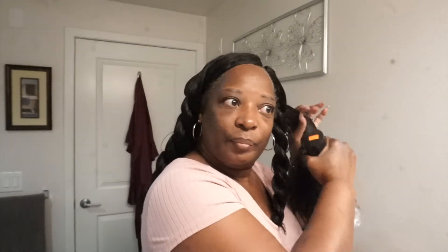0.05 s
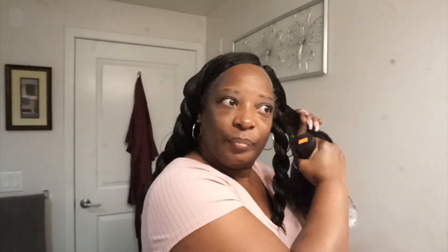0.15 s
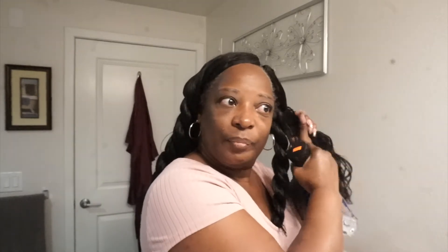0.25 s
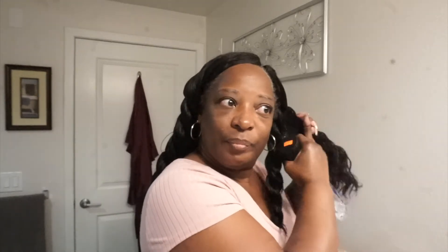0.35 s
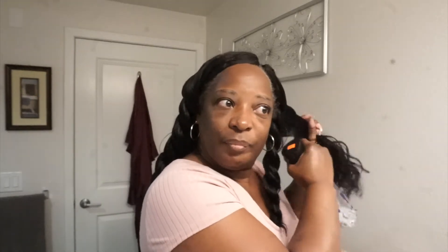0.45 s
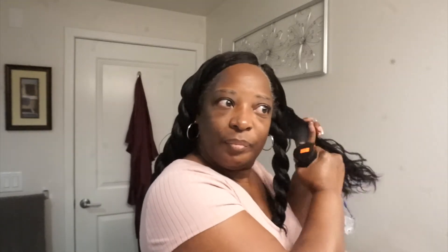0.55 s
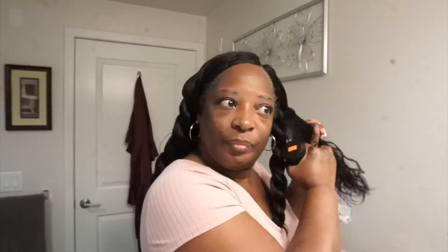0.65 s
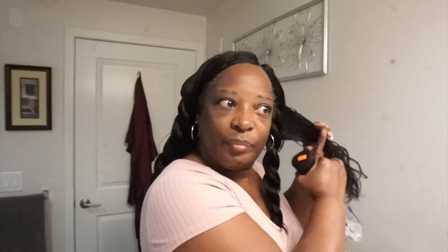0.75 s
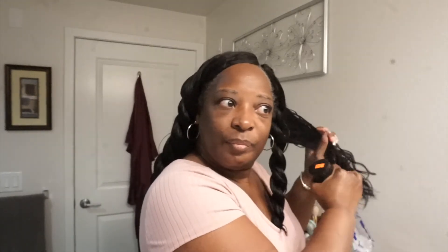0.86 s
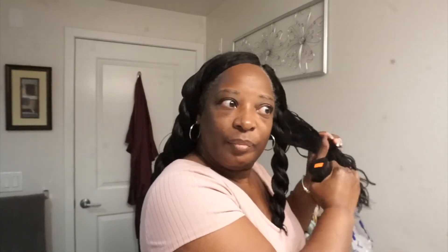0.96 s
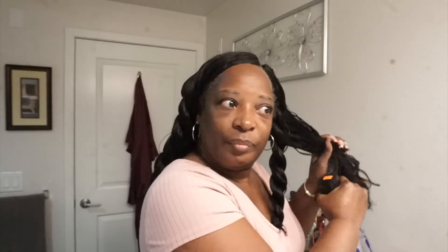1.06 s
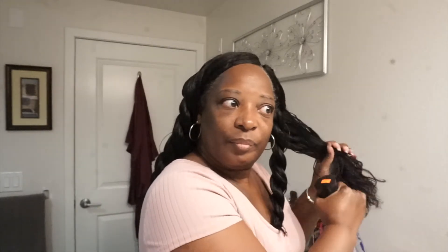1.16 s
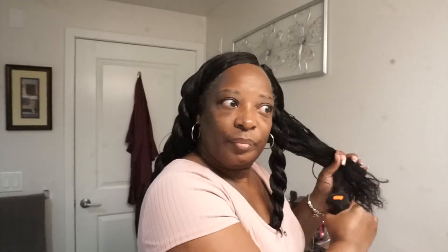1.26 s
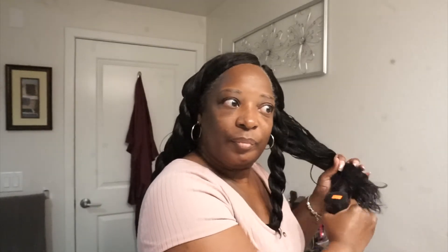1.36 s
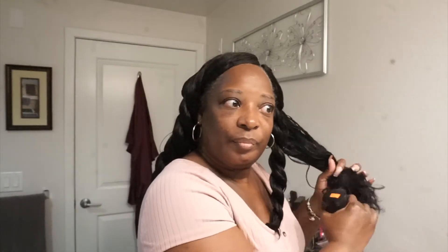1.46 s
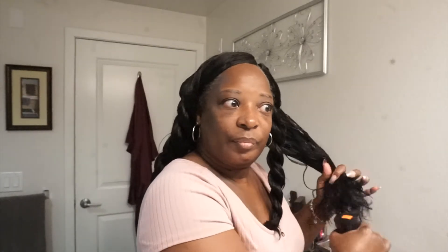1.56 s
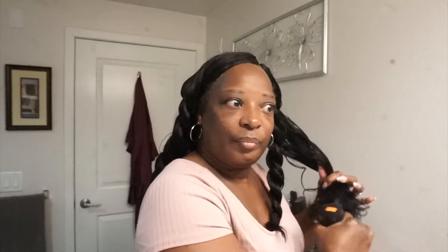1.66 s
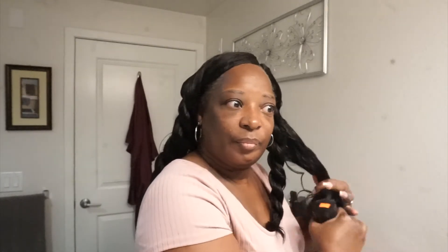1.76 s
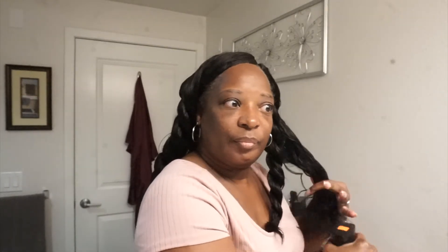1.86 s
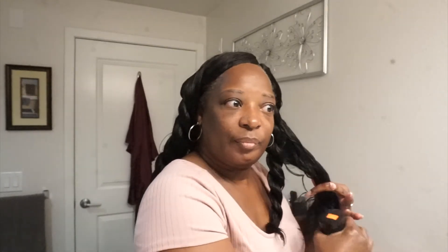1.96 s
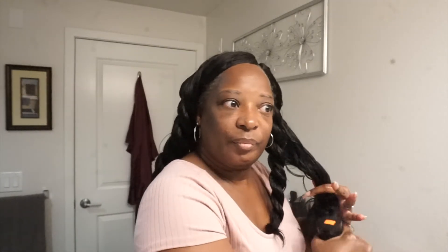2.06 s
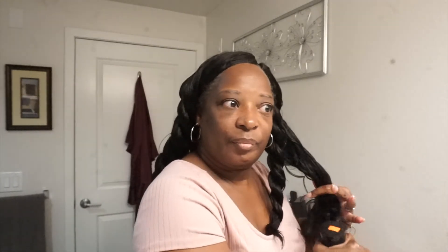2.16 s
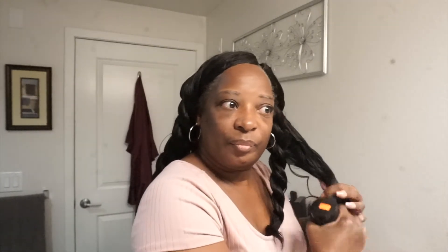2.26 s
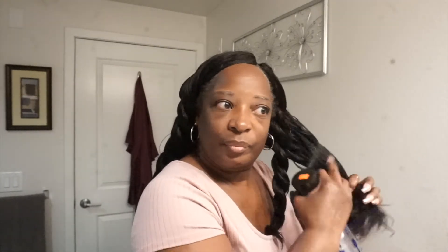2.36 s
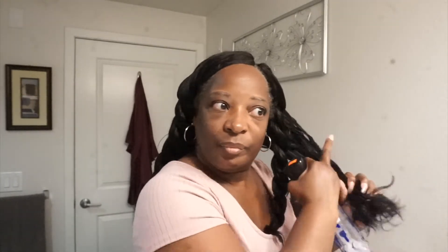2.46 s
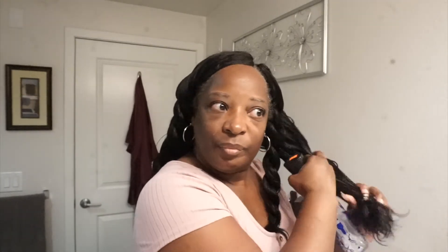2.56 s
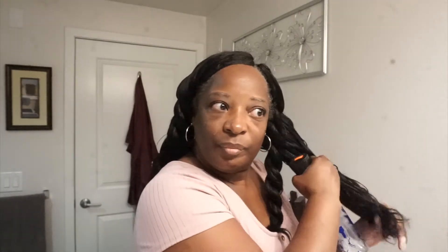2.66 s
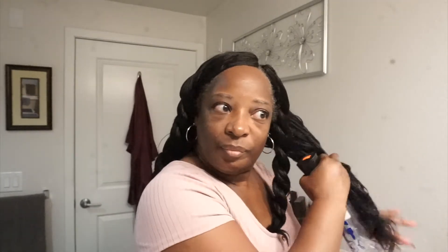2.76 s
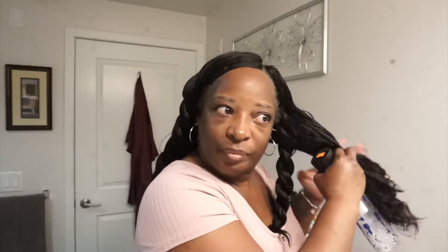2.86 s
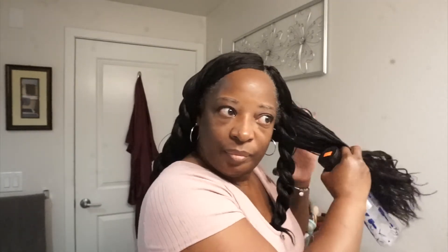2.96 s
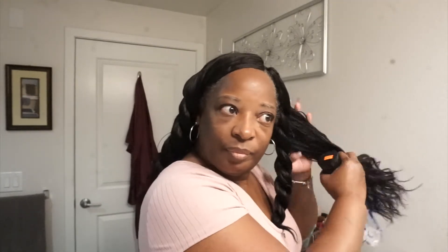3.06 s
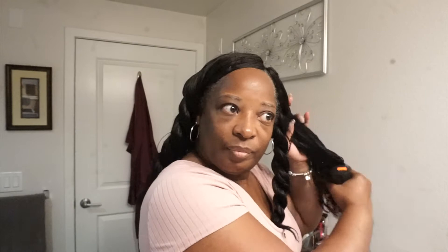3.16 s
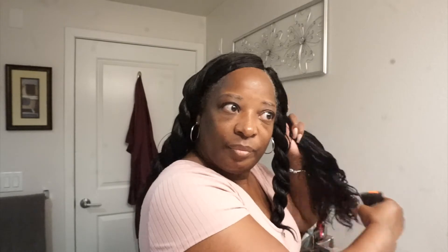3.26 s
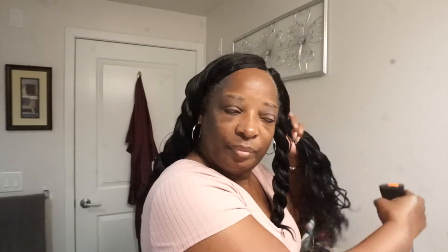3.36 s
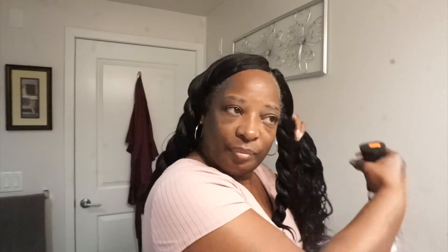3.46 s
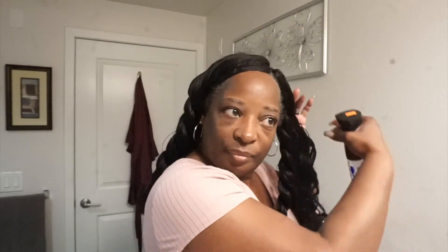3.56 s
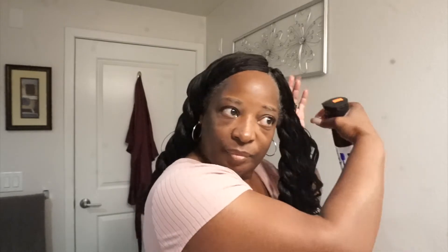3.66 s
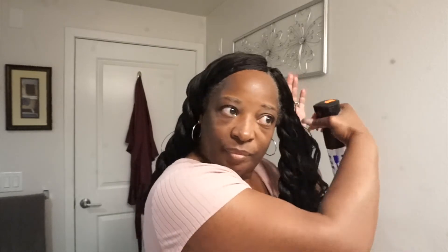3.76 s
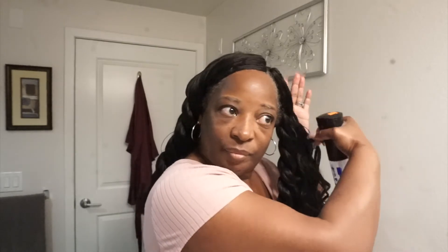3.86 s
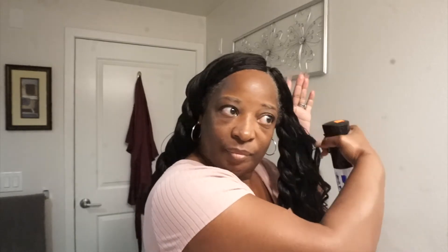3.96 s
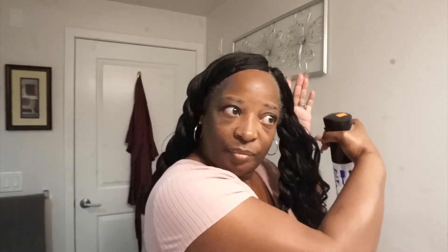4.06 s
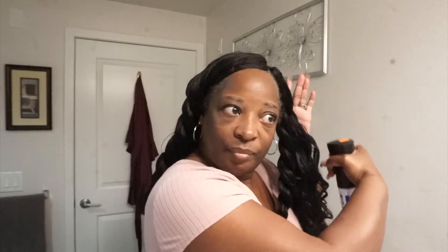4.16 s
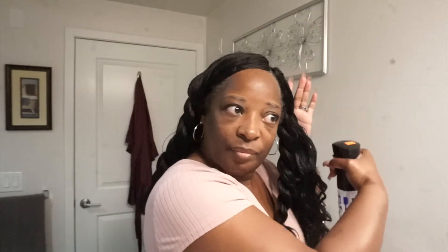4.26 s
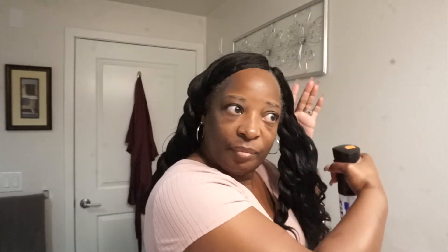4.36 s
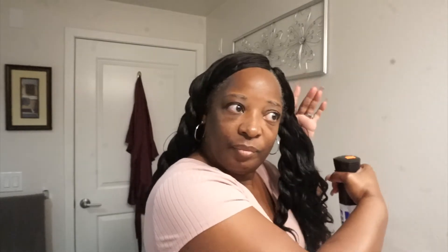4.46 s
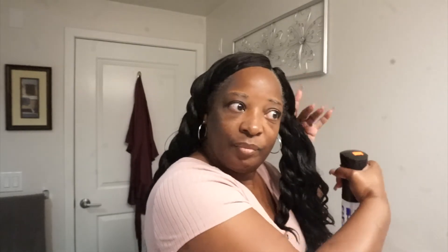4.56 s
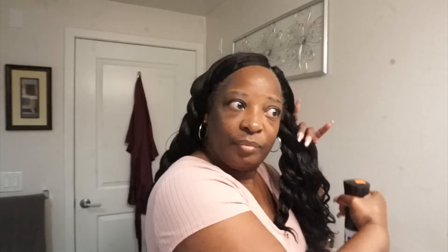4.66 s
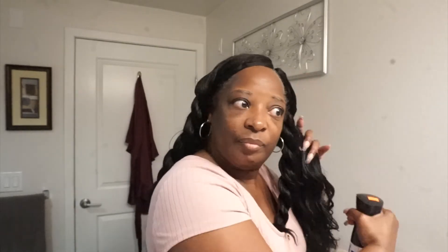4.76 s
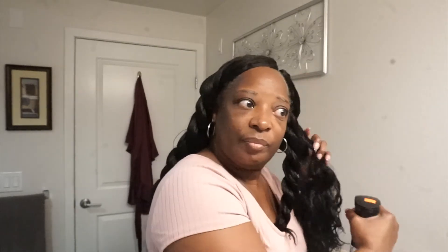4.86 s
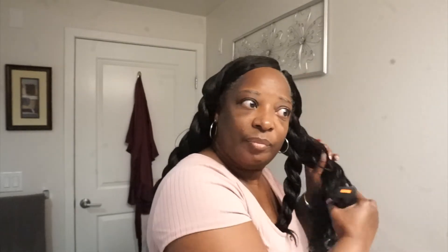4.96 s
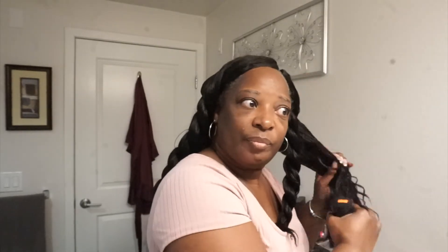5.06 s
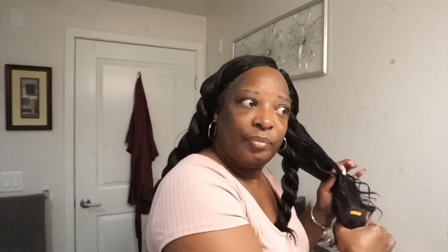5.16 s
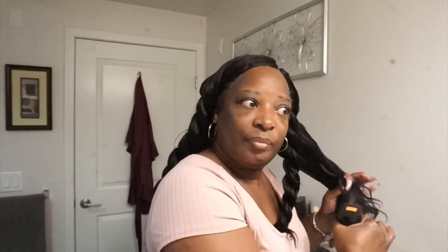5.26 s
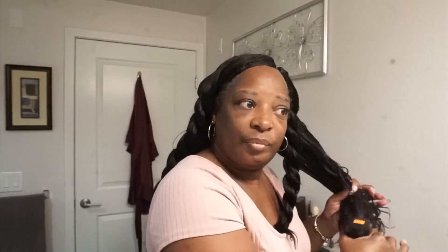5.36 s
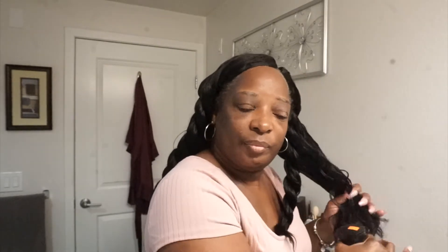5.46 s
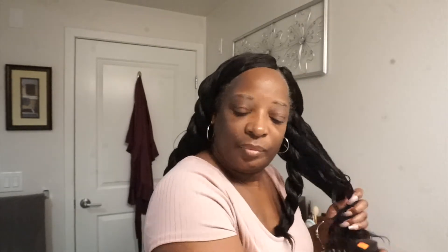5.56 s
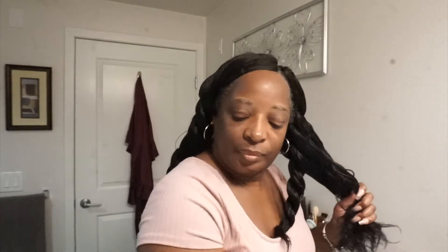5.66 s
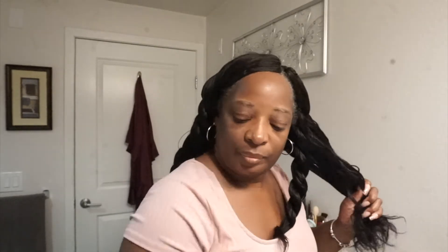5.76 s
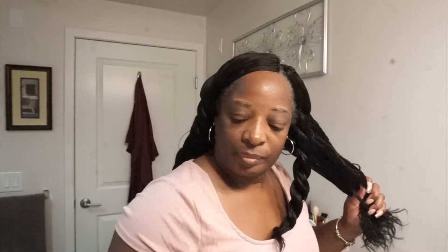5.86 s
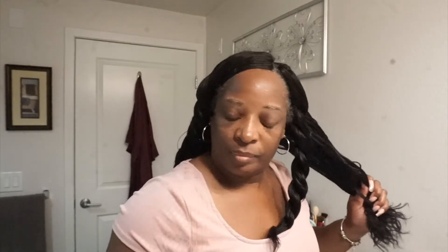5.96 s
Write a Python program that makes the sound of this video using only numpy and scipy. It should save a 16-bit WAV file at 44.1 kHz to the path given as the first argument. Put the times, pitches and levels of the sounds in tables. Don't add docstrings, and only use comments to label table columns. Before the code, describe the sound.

A small hard-walled bathroom with a constant, low-level fan hum and airy ventilation noise, heard on a stereo phone about a metre away. A mist spray is already ending at 0 s, with a hollow tap and small trigger ticks up to 0.35 s. A long, bright, fizzy hiss runs from 0.4 to 1.45 s, with crisp clicks at about 0.8 and 1.3. Shorter hisses follow at 1.5-1.75 and 2.0-2.35, the latter fading, with more ticks and dull bottle knocks. At 2.73 a hard plastic double rap cracks out, the loudest event, ringing briefly off the walls. Faint ticks come at 3.1 and 3.6. A long steady hiss fills 3.75-4.65, with a resonant hollow knock near 3.9. Light clicks lead into the last spray, 5.0-5.55, which has a click around 5.36. Soft ticks and a faint dying hiss leave the fan until 6 s.

```python
import sys
import numpy as np
from scipy import signal
from scipy.fft import rfft, irfft, next_fast_len
from scipy.io import wavfile
from scipy.ndimage import uniform_filter1d, map_coordinates

SR = 44100
rng = np.random.default_rng(int(sys.argv[2]) if len(sys.argv) > 2 else 0)


def amplitude_ratio(level_db):
    exponent = np.asarray(level_db, float) / 20
    return 10 ** exponent


def int16_out(signal):
    q = np.round(np.clip(np.atleast_2d(signal).T, -1, 1) * 32767)
    wavfile.write(sys.argv[1], SR, q.astype(np.int16))


N = 264864

# pitch_hz, width_hz, level_db
FAN_TONES = [(119.5, 6, -108), (241, 5.5, -82.5), (367.7, 9.5, -78.5), (476, 10, -79), (592, 14, -78.5),
             (1320, 6, -76), (1384, 11, -80)]
# freq_hz, density_db (per Hz)
AIR_SPECTRUM = [(35, -78), (60, -30.5), (203, -24.5), (232, -13.5), (329, -17), (367, -2.5), (400, -12),
                (605, -5), (705, -9.5), (1220, -9), (1330, -7.5), (1510, -9.5), (11000, -20), (14300, -96),
                (22000, -120)]
# freq_hz, likeness (-1 to 1)
AIR_ALIKE = [(60, 0.26), (220, 0.56), (830, -0.22), (3100, -0.035), (11500, 0.13)]
# time_s, gain_db
AIR_DRIFT = [(0, 2), (2.6, 2.5), (3.3, -0.5), (4.9, 2), (6, 0)]
# freq_hz, t60_s
WALL_DECAY = [(500, 0.59), (1500, 0.43), (3000, 0.46), (6000, 0.34), (11000, 0.28)]
# freq_hz, likeness (-1 to 1)
WALL_ALIKE = [(300, 0.83), (1200, 0.26), (2500, 0.36), (5000, 0), (11000, 0.16)]
# start_s, level_db, crack_db (over the blow)
RAPS = [
    (2.7297, -21.5, -54),
    (2.7329, -15, -31),
]
# pitch_hz, width_hz, level_db
SHELL_MODES = [(775, 250, -7), (1300, 180, 4), (1600, 290, 1.5), (2240, 246, 5.5), (3120, 380, -1),
               (4160, 360, -10.5)]
# start_s, level_db, bright_db (over tick), lever_hz, lever_db (over tick)
TICKS = [(0.1255, -41, -21.5, 2340, -23), (0.332, -39.5, -15, 3130, -7), (0.3352, -43, -9, 2340, 2),
         (0.8160, -31.5, 6.5, 3920, 4.5), (1.279, -29, 3, 3390, -14), (1.956, -40.5, -10, 2230, -20),
         (2.173, -31.5, 6, 1950, 0.5), (2.3107, -31, -12, 3250, -12), (2.4763, -46, -30, 2800, -9),
         (2.481, -51, -30, 1800, 1), (2.5194, -43, -11, 3240, -6), (2.555, -55, -19, 3500, 0),
         (3.144, -49, -12, 1690, -3), (3.558, -53, -10, 1870, -3), (3.561, -49, 2.5, 3280, 2),
         (3.623, -45.5, -16, 3200, -4), (3.633, -50.5, -24, 3280, -4), (3.8759, -38, -31, 1780, 8.5),
         (4.959, -40.5, -12, 3700, -5), (4.9645, -47.5, -7, 3600, -14), (5.011, -46.5, -2, 2800, -1),
         (5.3617, -35, 5, 3100, -10), (5.648, -45, -2, 2820, 5), (5.6517, -42, 1, 3500, 0.5)]
# pitch_hz, width_hz, level_db
LEVER_MODES = [(1720, 350, -1), (2340, 180, 6.5), (3370, 220, 1.5), (4370, 640, -5)]
# start_s, level_db, pitch_hz, width_hz (damping by the grip)
KNOCKS = [(0.036, -38, 916, 100), (0.125, -48, 910, 150), (0.812, -41, 890, 200), (0.879, -49.5, 910, 200),
          (1.277, -38, 937, 150), (1.86, -53.5, 930, 150), (2.17, -40, 896, 200), (2.31, -37, 900, 169),
          (2.421, -35, 946, 170), (3.874, -29.5, 946, 34.8), (5.358, -43, 944, 150),
          (5.529, -39.5, 903, 150), (5.68, -61, 940, 150)]
# pitch_hz, width_hz, level_db
BOTTLE_MODES = [(854, 130, -5.5), (937, 94, 5), (1146, 1100, -9)]
# start_s, end_s, pitch_hz, width_hz, level_db
LINGERS = [
    (4.62, 4.8, 3970, 640, -61),
    (5.56, 5.74, 1170, 1000, -61),
    (5.7, 5.95, 2700, 2800, -69.5),
    (0.54, 0.85, 3130, 990, -54),
    (5.08, 5.5, 3380, 510, -55),
]
# start_s, end_s, jet_db, drift_db_per_s, hum_db (bottle hum over jet)
BURSTS = [
    (-.3, 0.037, -43, -9, -16.5),
    (0.427, 1.456, -46, -1.5, -19),
    (1.498, 1.764, -45, -6, -20.5),
    (2.01, 2.363, -45.5, -9, -17),
    (3.743, 4.646, -45.5, -1.5, -20),
    (5.028, 5.551, -46, -2.5, -19.5),
]
# freq_hz, density_db (per Hz)
JET_SPECTRUM = [(650, -63), (1100, -20), (1260, -18), (1460, -16), (1550, -17), (1760, -12), (2160, -6),
                (2290, -3.5), (2910, -1.5), (6000, -9), (7800, -10), (13200, -120)]
# freq_hz, density_db (per Hz)
FIZZ_SPECTRUM = [(2350, -39), (4000, -2.5), (7100, 1), (10600, 4.5), (11100, 0.5), (11300, -74),
                 (14700, -39), (22000, -120)]


def unit(x):
    return x / np.sqrt(np.mean(x ** 2) + 1e-20)


def along(points, hz):
    f, v = np.transpose(points)
    return np.interp(np.log(hz + 1), np.log(f + 1), v)


def wobble(rate):
    knots = rng.standard_normal(int(N * rate / SR) + 4)
    return map_coordinates(knots, [np.arange(N) * rate / SR])


def filtered(x, response):
    n = x.shape[-1]
    m = next_fast_len(n + 8192)
    return irfft(rfft(x, m) * response(np.fft.rfftfreq(m, 1 / SR)), m)[..., :n]


def resonant(modes):
    def response(f):
        total = 0
        for k, (hz, width, db) in enumerate(modes):
            total = total + (-1) ** k * amplitude_ratio(db) * 1j * f * width / (hz * hz - f * f + 1j * f * width)
        return total
    return response


def paired(noises, alike):
    def mid_side(hz):
        turn = np.arccos(np.clip(along(alike, hz), -1, 1)) / 2
        return np.array([np.cos(turn), np.sin(turn)])
    mid, side = filtered(noises, mid_side)
    return np.array([mid + side, mid - side])


def turbulence(spectrum, patchy_db):
    z = signal.stft(rng.standard_normal(N), nperseg=256)[2]
    patches = uniform_filter1d(rng.standard_normal(z.shape), size=4, axis=0)
    patches = uniform_filter1d(patches, size=8, axis=1)
    noise = signal.istft(z * amplitude_ratio(patchy_db * unit(patches)), nperseg=256)[1][:N]
    return unit(filtered(noise, lambda hz: amplitude_ratio(along(spectrum, hz))))


def room(x):
    hop = SR // 5
    window = np.sqrt(np.hanning(2 * hop))
    wet = np.zeros((2, N + 3 * SR))
    for start in range(-hop, N, hop):
        first = max(start, 0)
        part = x[first:start + 2 * hop] * window[max(-start, 0):][:N - first]
        hz, t, z = signal.stft(rng.standard_normal((2, 2 * SR // 5)), SR, nperseg=128)
        decay = amplitude_ratio(-60 * t / along(WALL_DECAY, hz)[:, None])
        tail = paired(signal.istft(z * decay, SR, nperseg=128)[1], WALL_ALIKE)
        echo = signal.fftconvolve(part[None], tail / np.linalg.norm(tail[0]), axes=1)
        at = first + round(.002 * SR)
        wet[:, at:at + echo.shape[1]] += echo
    return wet[:, :N]


def mirror(x):
    t60_s, nearest_s = 0.072, .002
    t = np.arange(SR // 20) / SR
    noises = rng.standard_normal((2, len(t))) * amplitude_ratio(-60 * t / t60_s) * (t > nearest_s)
    early = paired(noises, WALL_ALIKE)
    return signal.fftconvolve(x[None], early / np.linalg.norm(early[0]), axes=1)[:, :N]


def fan():
    noises = np.array([turbulence(AIR_SPECTRUM, patchy_db=0.5), turbulence(AIR_SPECTRUM, patchy_db=-0.5)])
    air = unit(paired(noises, AIR_ALIKE))
    t = np.arange(N) / SR
    tones = 0
    for hz, width, db in FAN_TONES:
        level = amplitude_ratio(db + 2.5 + 0.76 * np.array([wobble(width), wobble(width)]))
        tones = tones + level * np.sin(2 * np.pi * hz * t + 0.5 * wobble(width))
    air_db = -61 + np.interp(t, *np.transpose(AIR_DRIFT))
    return amplitude_ratio(air_db) * air + tones


def rap():
    blows, cracks = np.zeros((2, N))
    for s, db, crack_db in RAPS:
        blows[round(s * SR)] = amplitude_ratio(db + 20)
        cracks[round(s * SR)] = amplitude_ratio(db + 25.5 + crack_db)
    crack_modes = [(5500, 2100, 12.2), (7500, 9700, 1)]  # Hz, width Hz, dB
    return filtered(blows, resonant(SHELL_MODES)) + filtered(cracks, resonant(crack_modes))


def scrape(t60):
    t = np.arange(600) / SR
    burst = rng.standard_normal(len(t)) * amplitude_ratio(-60 * t / t60)
    return burst / np.linalg.norm(burst)


def trigger():
    lever, bright, knock = np.zeros((3, N + SR))
    contact = np.pad([1.], (0, 1500))
    for s, db, bright_db, hz, ring_db in TICKS:
        at = round(s * SR)
        shake = filtered(contact, resonant(LEVER_MODES))
        shake = shake + amplitude_ratio(ring_db + 4.5) * filtered(contact, resonant([(hz, 300, 0)]))
        lever[at:at + len(shake)] += amplitude_ratio(db + 19) * shake
        rattle_s = .005 * amplitude_ratio(.9 * (db + 45))
        bright[at:at + 600] += amplitude_ratio(db + bright_db + 20) * scrape(rattle_s)
    push = np.pad([1.], (0, 3000))
    for s, db, hz, width_hz in KNOCKS:
        at = round(s * SR)
        knock[at:at + 3001] += amplitude_ratio(db + 37.5) * filtered(push, resonant([(hz, width_hz, 0)]))
    crackle = filtered(bright, lambda f: resonant([(6200, 6500, 0)])(f) ** 2)
    snap = filtered(lever, resonant([(2800, 9400, 0)]))
    hollow = filtered(knock, resonant([(948, 320, 0)]))
    return snap[:N], crackle[:N], hollow[:N]


def linger():
    out = np.zeros(N)
    for start, end, hz, width_hz, db in LINGERS:
        span = slice(round(start * SR), round(end * SR))
        n = span.stop - span.start
        throat = resonant([(hz, width_hz, 0)])
        hiss = filtered(rng.standard_normal(n), lambda f: throat(f) ** 2)
        out[span] += amplitude_ratio(db) * unit(hiss) * np.sqrt(np.hanning(n))
    return out


def spray():
    rise_s, swell_s, fizz_rise_s = 0.024, 0.12, 0.051
    sag_s, shut_t60_s = 0.047, 0.057
    t = np.arange(N) / SR
    levels = np.zeros((3, N))
    for opens, shuts, db, drift_db, hum_db in BURSTS:
        length = shuts - opens
        age = np.clip(t - opens, 0, length)
        sag = np.exp(-np.clip(shuts - t, 0, None) / sag_s)
        shut = amplitude_ratio(-60 * np.clip(t - shuts, 0, 1) / shut_t60_s) * (t >= opens)
        jet_db = db + drift_db * (age - length / 2)
        jet_db = jet_db - 7.5 * np.exp(-age / rise_s) - 1.5 * np.exp(-age / swell_s)
        fizz_db = db - 0.14 - 2 * np.exp(-age / fizz_rise_s) - 5 * sag
        sung_db = jet_db + hum_db + 3.5 * sag
        levels += shut * amplitude_ratio([jet_db - sag, fizz_db, sung_db])
    sputter = amplitude_ratio(1.1 * wobble(400))
    jet = unit(sputter * turbulence(JET_SPECTRUM, patchy_db=.6))
    fizz = unit(sputter * turbulence(FIZZ_SPECTRUM, patchy_db=.4))
    hum = unit(filtered(rng.standard_normal(N), resonant(BOTTLE_MODES)))
    return levels[0] * jet + levels[2] * hum, levels[1] * fizz


def scene():
    background = fan()
    blow = rap()
    ticks, crackle, knocks = trigger()
    jet, fizz = spray()
    jet = jet + linger()
    direct = amplitude_ratio(3) * jet + amplitude_ratio(-42) * fizz
    direct = direct + amplitude_ratio(1.5) * ticks + amplitude_ratio(4.0) * crackle + amplitude_ratio(1) * knocks + blow
    ports = np.array([amplitude_ratio(-.3) * np.roll(direct, 2), amplitude_ratio(.3) * direct])
    near = mirror(amplitude_ratio(2) * crackle + amplitude_ratio(5.0) * ticks + amplitude_ratio(-4.5) * knocks + amplitude_ratio(-2.0) * blow)
    to_walls = amplitude_ratio(0.5) * jet + amplitude_ratio(2.0) * fizz + amplitude_ratio(6.5) * ticks
    to_walls = to_walls + amplitude_ratio(2.0) * crackle + amplitude_ratio(3.3) * knocks + amplitude_ratio(3) * blow
    return ports + near + room(to_walls) + background


def band_limit(x):
    return signal.sosfilt(signal.butter(12, 12140, fs=SR, output="sos"), x)


def record(dry):
    bass_hz, top_hz = 120, 11165
    heard = filtered(dry, lambda hz: (hz < top_hz) * (1j * hz / (bass_hz + 1j * hz)) ** 2)
    return band_limit(heard)


dry = scene()
out = record(dry)
int16_out(out)
```